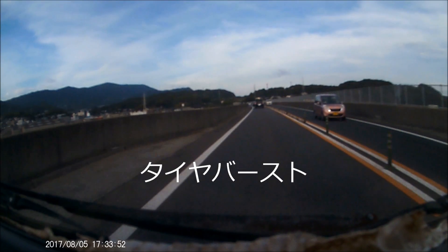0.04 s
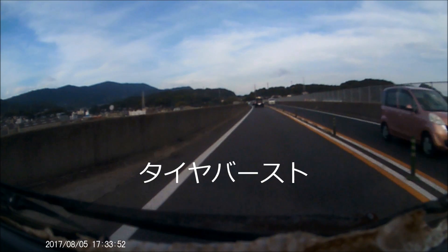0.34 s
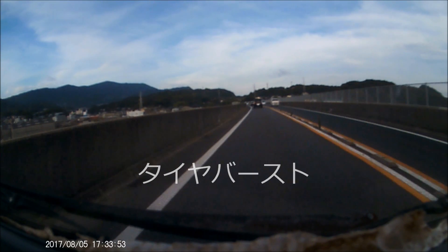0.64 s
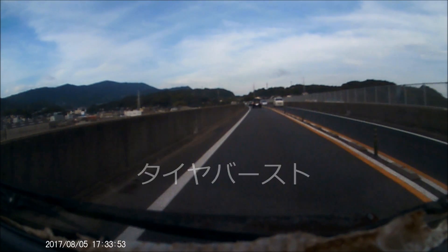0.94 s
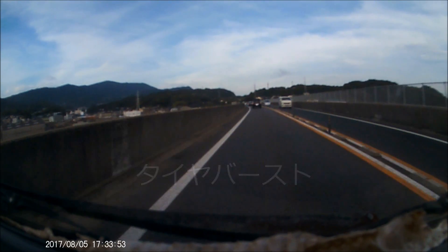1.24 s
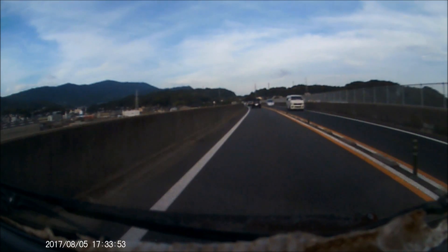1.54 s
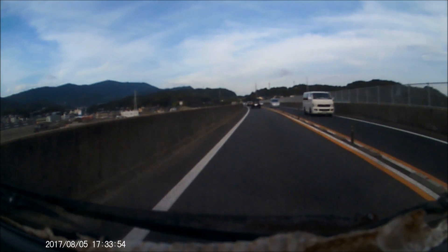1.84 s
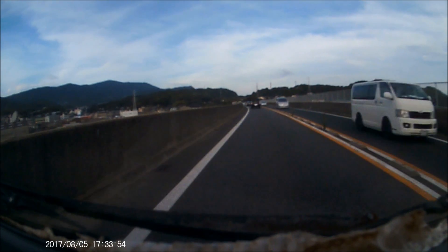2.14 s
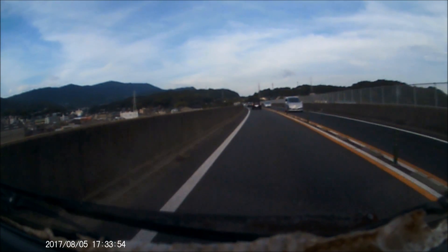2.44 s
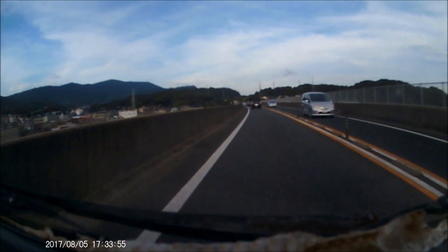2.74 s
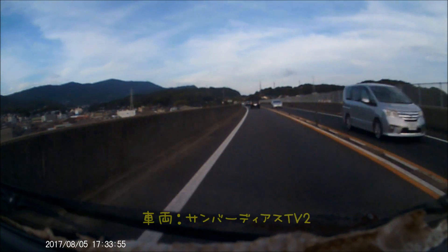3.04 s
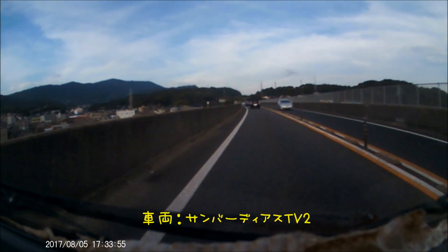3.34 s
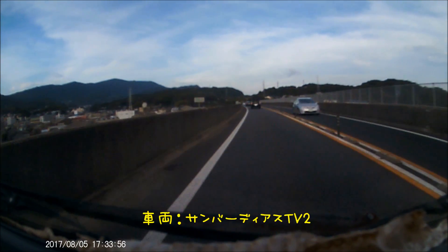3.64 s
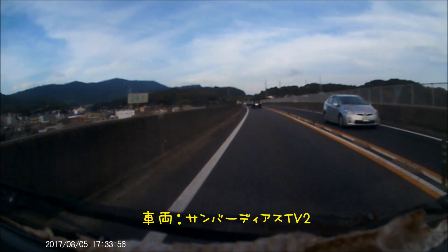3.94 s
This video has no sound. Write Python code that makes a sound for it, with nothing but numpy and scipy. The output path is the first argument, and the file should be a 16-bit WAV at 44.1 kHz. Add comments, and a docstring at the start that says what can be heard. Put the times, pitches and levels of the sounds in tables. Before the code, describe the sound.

A deep road rumble fills a small van at steady highway speed, with tyre roar, wind hiss and engine hum. Loose plastic trim knocks and crackles throughout, while the boom overloads the dashboard microphone and makes the roar flutter.

```python
"""Small van on the expressway

Inside the cabin at steady speed, an uneven tyre shakes up a low boom over tyre roar, wind hiss and
engine hum. Loose trim knocks and rattles, with bright crackles and a faint, thin jingle of keys.
The boom overloads the dashboard microphone, so the roar is choked on every swing and flutters."""
import sys
import numpy as np
from scipy import signal
from scipy.fft import rfft, irfft
from scipy.io import wavfile

SR = 44100
rng = np.random.default_rng(int(sys.argv[2]) if len(sys.argv) > 2 else 0)


def generate_wav(signal):
    """Clip the signal to [-1, 1] and save it as 16-bit WAV at the path in sys.argv[1]."""
    frames = np.transpose(np.atleast_2d(signal))
    scaled = np.clip(frames, -1, 1) * 32767
    pcm = np.round(scaled).astype(np.int16)
    wavfile.write(sys.argv[1], SR, pcm)


N = 176400
TIME = np.arange(N) / SR

# cabin shake: t/s, relative level/dB twice per wheel turn, relative level/dB four times per turn
TYRE_SHAKE = [(0.0, -25.5, -14.5), (0.15, -13.5, -18), (0.7, -14.5, -21.5), (1.29, -19.5, -13),
              (1.38, -12, -20.5), (1.43, -26.5, -33), (1.51, -6.5, -15), (1.64, -18.5, -19),
              (2.45, -11.5, -20.5), (2.65, -17.5, -14.5), (2.71, -12.5, -31), (2.81, -21, -17.5),
              (3.39, -12.5, -17), (3.44, -16, -40), (3.51, -26, -9), (3.61, -11.5, -22.5), (3.95, -12, -12),
              (4.0, -17, -26)]
# colour of the body rumble from the road: f/Hz, relative level/dB
RUMBLE_COLOUR = [(12, -9), (22, -2), (33, -3), (43, 1), (62, -3), (80, -11), (130, -24), (500, -100)]
# colour of the tyre roar and wind hiss: f/Hz, relative level/dB
ROAR_COLOUR = [(45, 7.5), (105, 1), (185, 0.5), (310, -4), (460, -8.5), (660, -10.5), (910, -14.5),
               (1220, -19), (1540, -28), (1840, -30.5), (2340, -37), (2740, -31.5), (3140, -33.5),
               (3540, -34.5), (4240, -44), (4920, -38), (5720, -49), (8850, -51.5), (10100, -56),
               (15100, -63)]
# slow swell of the roar and hiss: t/s, relative level/dB
ROAR_SWELL = [(0, 1.5), (.2, 1.5), (.65, 1), (.8, 3), (1.25, 2), (1.46, 2.5), (1.7, 2.5), (2.05, 0.8),
              (2.22, 3.5), (2.6, 1.5), (2.76, 3), (2.9, 3), (3.6, 2.3), (4, 3.5)]
# engine hum and gear whines: f/Hz, rms level/dB, waver depth/ratio
ENGINE_TONES = [(161.2, -27.5, 0.23), (482, -43, 0.99), (508.3, -40.5, 0.66), (598, -43, 0.079),
                (652.7, -44, 1), (2750, -71, 0.45), (3740, -68, 0.7), (5300, -78.5, .6), (7960, -94, .12)]
# knocks of loose trim: t/s, relative level/dB
TRIM_KNOCKS = [(.0195, -24), (.149, -31.5), (.171, -33.5), (0.2243, -33), (.287, -32.5), (.326, -28.5),
               (.4, -28.5), (0.4772, -24.5), (.556, -25.5), (.608, -31.5), (0.917, -32), (.937, -32),
               (1.096, -27), (1.2418, -32), (1.454, -29.5), (1.549, -29.5), (1.604, -36), (1.625, -46),
               (1.779, -28.5), (1.9107, -25.5), (1.933, -26.5), (2.064, -31), (2.1379, -29.5), (2.163, -29),
               (2.198, -30.5), (2.216, -23.5), (2.237, -28), (2.318, -22.5), (2.3685, -36.5), (2.467, -23),
               (2.525, -27), (2.676, -29.5), (2.75, -27.5), (2.773, -24.5), (2.829, -28), (2.905, -27),
               (2.927, -26), (2.981, -34), (3.058, -28.5), (3.08, -33.5), (3.135, -29), (3.192, -31.5),
               (3.236, -25.5), (3.3056, -20.5), (3.3415, -29.5), (3.461, -32), (3.518, -28), (3.614, -20.5),
               (3.672, -17), (3.727, -29), (3.769, -26), (3.828, -31.5), (3.844, -22), (3.878, -32.5),
               (3.9, -29), (3.924, -34)]
# ring of the plastic trim: f/Hz, width/Hz, relative level/dB
TRIM_RING = [(516, 370, 9), (1110, 640, 7), (1787, 410, 9.5), (2920, 194, -4), (3450, 350, 2),
             (5090, 220, -3.5), (6110, 900, -15)]
# thin, bright crackles: t/s, relative level/dB
BRIGHT_CRACKLES = [(.462, -24), (.533, -36), (.854, -24), (.894, -30), (.937, -42), (1.143, -32),
                   (1.2375, -32), (1.338, -31), (1.406, -30), (1.466, -29), (1.718, -33), (2.0, -35),
                   (2.123, -35), (2.1485, -31), (2.256, -36), (2.6314, -33), (3.057, -33), (3.31, -30)]
# faint, thin, high rings of jingling keys: t/s, f/Hz, level/dB
KEY_RINGS = [(.32, 8400, -65), (.70, 9900, -70), (1.04, 8650, -63), (2.22, 9050, -68), (3.04, 9000, -63),
             (3.2, 8900, -66), (3.96, 8600, -66)]
# keys brushing together: t/s, relative level/dB
KEY_BRUSHES = [(.04, -67), (.33, -69), (.7, -76), (1.04, -73), (1.77, -72), (2.21, -75), (2.58, -68),
               (3.04, -77), (3.95, -71)]
# tones of the brushing keys: f/Hz, relative level/dB
KEY_TONES = [(8560, 3), (8910, 0), (9170, -7), (9950, -8.5), (10420, -7), (11280, -6)]

WHEEL_TURNS_PER_S, SPEED_WANDER, SHAKE_DELAY_S = 13.065, .001, 0.00908
GRIT = 0.23   # strength of the scrape against the blow that starts it


def boom(rumble_db=-16.5):
    """An uneven tyre swings the cabin twice and four times per wheel turn, over road rumble."""
    travel_s = np.cumsum(1 + SPEED_WANDER * drift(4.5)) / SR
    angle = 2 * np.pi * WHEEL_TURNS_PER_S * (travel_s - SHAKE_DELAY_S)
    second_db, fourth_db = in_time(TYRE_SHAKE)
    shake = from_db(second_db + 4) * np.sin(2 * angle) + from_db(fourth_db + 3) * np.sin(4 * angle)
    return np.sqrt(2) * shake + from_db(rumble_db) * noise(RUMBLE_COLOUR)


def roar(level_db=-23.5, surge_db=2, surge_hz=27):
    """Tyre roar and wind hiss swell slowly and surge briefly with the road surface."""
    swell_db, = in_time(ROAR_SWELL)
    return from_db(level_db + swell_db + surge_db * drift(surge_hz)) * noise(ROAR_COLOUR)


def engine(waver_hz=12):
    """Firing hum and gear whines, each wavering in strength and phase."""
    out = 0
    for hz, db, depth in ENGINE_TONES:
        waver = 1 + depth * (drift(waver_hz) + 1j * drift(waver_hz))
        tone = (waver * np.exp(2j * np.pi * hz * TIME)).real
        out = out + from_db(db) * rms_one(tone)
    return out


def knocks(bounce_s=0.001502, bounce_db=-7):
    """Loose trim knocks close to the microphone, bouncing once each time."""
    s, db = np.transpose(TRIM_KNOCKS)
    hits = struck_trim(s, db)
    bounces = struck_trim(s + bounce_s * rng.uniform(0.55, 1.0, len(s)), db + bounce_db)
    return hits + bounces


def struck_trim(s, db, flex_s=0.00056, scrape_s=0.00073, ring_db=18, detune=0.049, top_hz=7900):
    """Each gritty blow flexes a plastic panel, briefly pulling the pressure down, and sets it ringing."""
    t = np.arange(int(.03 * SR)) / SR
    flex = t / flex_s * np.exp(1 - t / flex_s)
    out = np.zeros(N + len(t))
    for start, blow_db in zip(np.clip((s * SR).astype(int), 0, N), db):
        span = slice(start, start + len(t))
        out[span] -= from_db(blow_db) * flex
        blow = (t == 0) + GRIT * np.exp(-t / scrape_s) * rng.standard_normal(len(t))
        for k, (hz, width_hz, mode_db) in enumerate(TRIM_RING):
            # no two blows land on the same spot, so strength and pitch scatter
            gain = from_db(ring_db + blow_db + mode_db + rng.normal())
            ring = resonance(blow, hz * (1 + detune * rng.normal()), width_hz)
            out[span] -= (-1) ** k * gain * ring
    return signal.sosfilt(signal.butter(2, top_hz, fs=SR, output="sos"), out[:N])


def crackles(scrape_s=0.0012, fine_per_s=35, fine_db=-46, spread_db=6.5, low_cut_hz=5000):
    """Tiny bright clicks with a gritty tail and no ring, among many finer ones."""
    s, db = np.transpose(BRIGHT_CRACKLES)
    fine = (rng.random(N) < fine_per_s / SR) * from_db(fine_db + spread_db * rng.standard_normal(N))
    clicks = np.zeros(N)
    np.add.at(clicks, (s * SR).astype(int), from_db(db + 1))
    tails = signal.lfilter([1], [1, -np.exp(-1 / (scrape_s * SR))], clicks + 1e-18)
    scrapes = GRIT * tails * rng.standard_normal(N)
    low_cut = signal.butter(1, low_cut_hz, "high", fs=SR, output="sos")
    return signal.sosfilt(low_cut, clicks + scrapes + fine)


def chatter(count=100, range_db=16.5):
    """Trim rattles faintly and at random around the cabin."""
    when, softness = rng.random((count, 2)).T
    return struck_trim(when * N / SR, -31.5 - range_db * softness)


def key_rings():
    """Jingling keys give faint, thin rings, each swelling and fading in one high resonance."""
    return sum(from_db(db) * swell(s, 0.051) * ringing_noise(hz, width_hz=130)
               for s, hz, db in KEY_RINGS)


def key_jingles(spread_db=3.5):
    """Keys brush together and ring in several thin, high tones at once."""
    out = 0
    for hz, mode_db in KEY_TONES:
        brush = sum(from_db(db + spread_db * rng.normal()) * swell(s, 0.05) for s, db in KEY_BRUSHES)
        out = out + from_db(mode_db) * brush * ringing_noise(hz, width_hz=35)
    return out


def overload(air):
    """The microphone flattens big pressure swings, with a harder knee on the push than on the pull."""
    return np.where(air > 0, saturate(air, limit=0.47, knee=22), saturate(air, limit=0.44, knee=2.16))


def saturate(x, limit, knee):
    """Clean when quiet, flattening towards the limit."""
    return x / (1 + np.abs(x / limit) ** knee) ** (1 / knee)


def from_db(db):
    """Decibels to gain."""
    return 10 ** (np.asarray(db) / 20)


def rms_one(x):
    """Scale to unit rms."""
    return x / np.sqrt(np.mean(x ** 2) + 1e-20)


def in_time(rows):
    """One automation curve for each column after the time."""
    s, *columns = np.transpose(rows)
    return [np.interp(TIME, s, column) for column in columns]


def swell(peak_s, half_width_s):
    """A bell-shaped fade in and out."""
    return np.exp(-((TIME - peak_s) / half_width_s) ** 2)


def noise(colour):
    """Steady noise of the given colour, rms 1."""
    hz, db = np.transpose(colour)
    bins = np.maximum(np.arange(N // 2 + 1) * SR / N, 1)
    gain = from_db(np.interp(np.log(bins), np.log(hz), db)) * (bins > hz[0] / 2)
    return rms_one(irfft(rfft(rng.standard_normal(N)) * gain, N))


def drift(rate_hz):
    """Random wander, mostly slower than the given rate, rms 1."""
    bins = np.arange(N // 2 + 1) * SR / N
    gain = (bins > 0) / (1 + (bins / rate_hz) ** 2)
    return rms_one(irfft(rfft(rng.standard_normal(N)) * gain, N))


def resonance(x, hz, width_hz):
    """One resonance with gain 1 at its peak."""
    r = np.exp(-np.pi * width_hz / SR)
    feedback = [1, -2 * r * np.cos(2 * np.pi * hz / SR), r * r]
    return signal.lfilter(np.array([1, 0, -1]) * (1 - r * r) / 2, feedback, x + 1e-18)


def ringing_noise(hz, width_hz):
    """Noise singing through one resonance, rms 1."""
    return rms_one(resonance(rng.standard_normal(N), hz, width_hz))


def scene():
    """The cabin bed through the overloaded microphone, with close knocks and crackles on top."""
    cabin = boom() + roar() + engine() + chatter() + key_rings() + key_jingles()
    return (overload(cabin) + knocks() + crackles())[None]


def record(dry, coupling_hz=4.2, ceiling=.5, hiss_db=-74, top_hz=15400):
    """Flat tops sag through the input coupling, peaks clip, faint hiss joins and the top end is cut."""
    x = signal.sosfilt(signal.butter(1, coupling_hz, "high", fs=SR, output="sos"), dry)
    x = np.clip(x, -ceiling, ceiling) + from_db(hiss_db) * rng.standard_normal(N)
    x = x * np.minimum((N / SR - TIME) / .004, 1)   # 4 ms fade-out
    return signal.sosfilt(signal.ellip(10, .1, 80, top_hz, fs=SR, output="sos"), x)


dry = scene()
out = record(dry)
generate_wav(out)
```